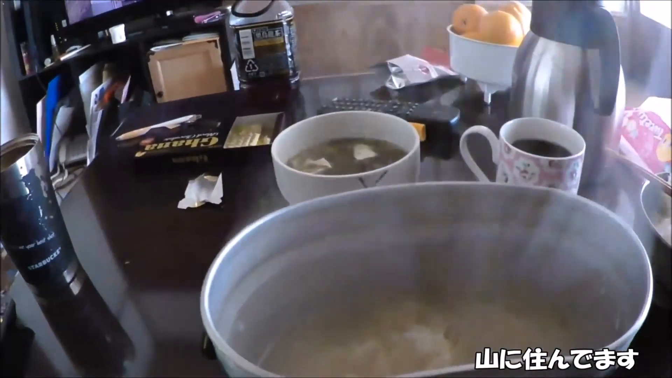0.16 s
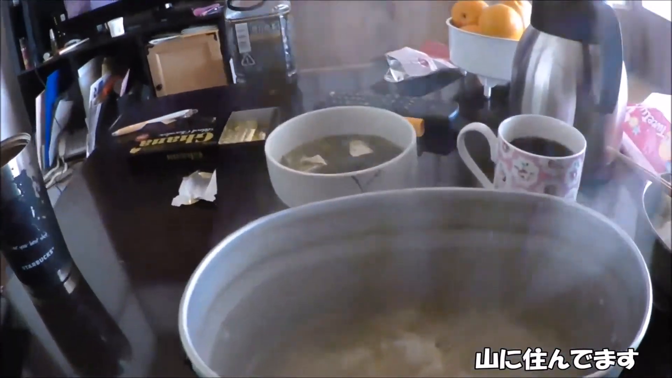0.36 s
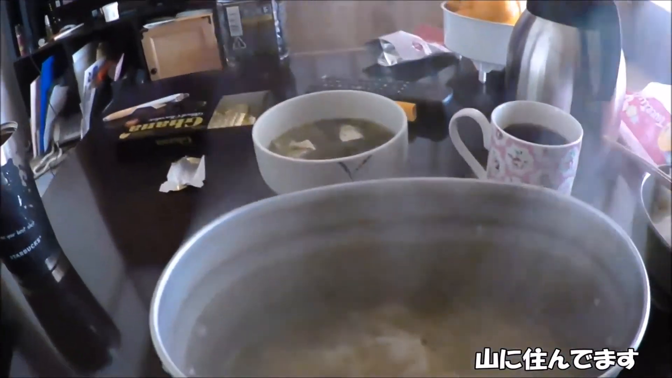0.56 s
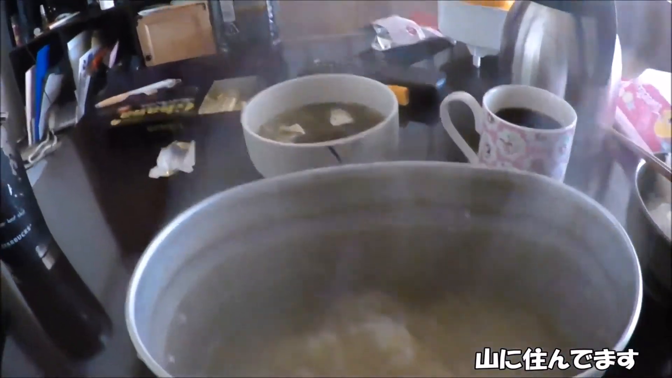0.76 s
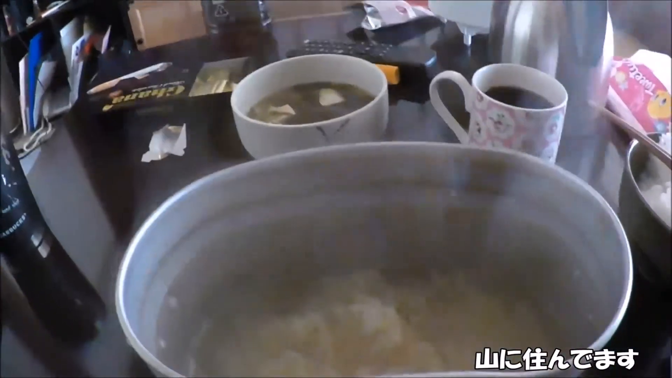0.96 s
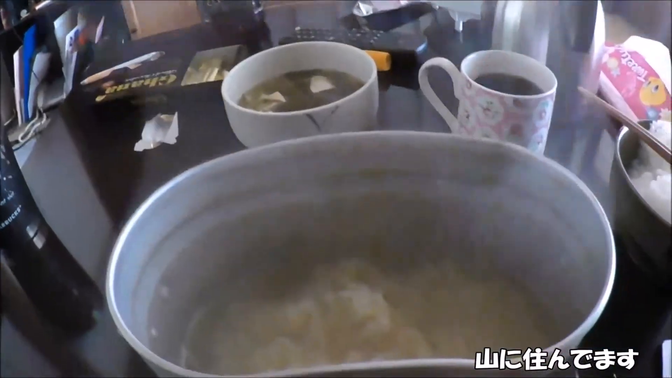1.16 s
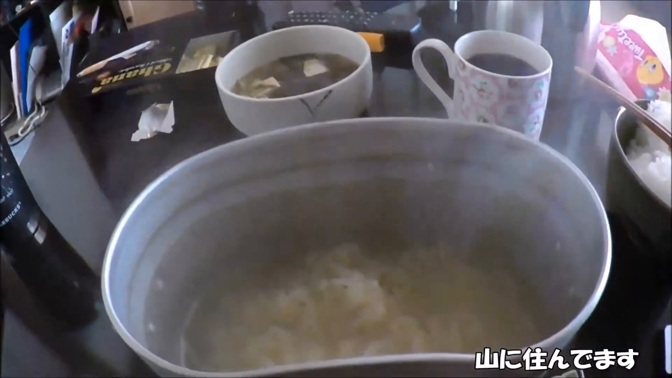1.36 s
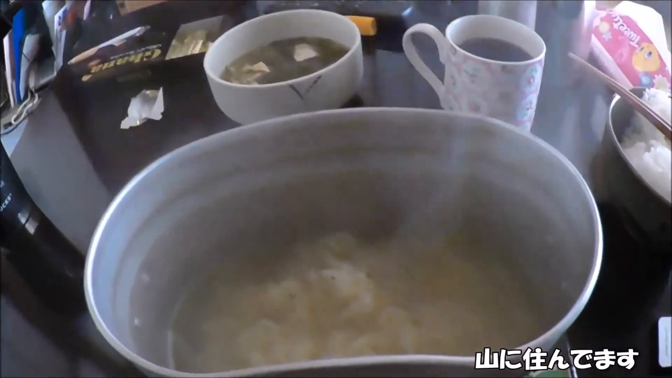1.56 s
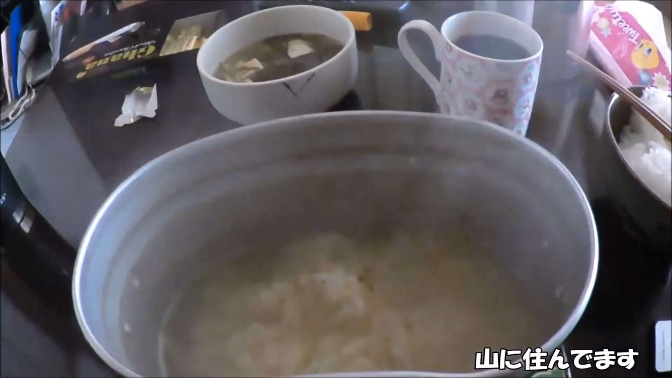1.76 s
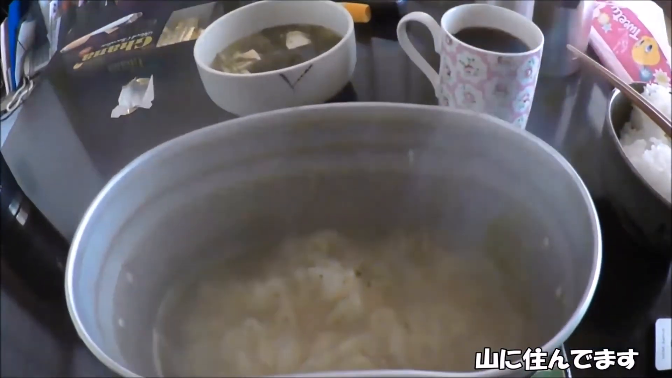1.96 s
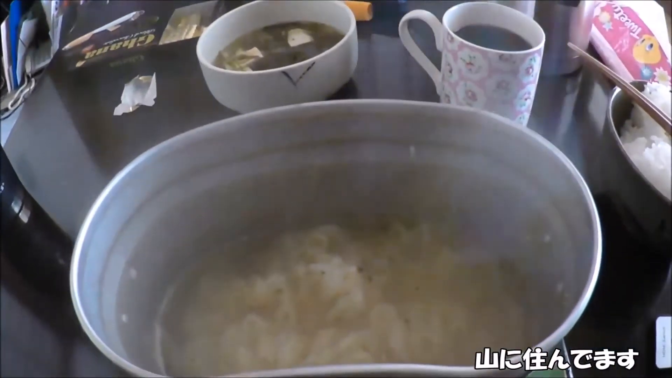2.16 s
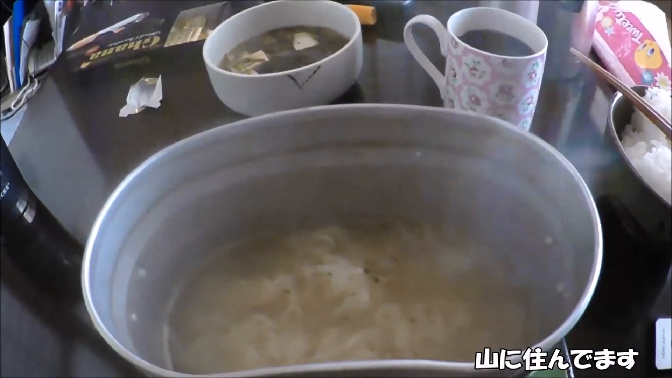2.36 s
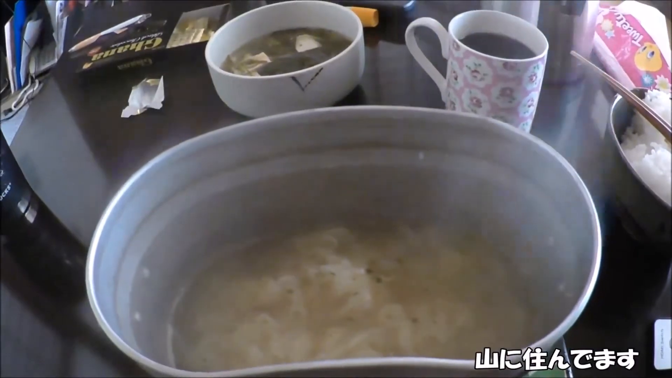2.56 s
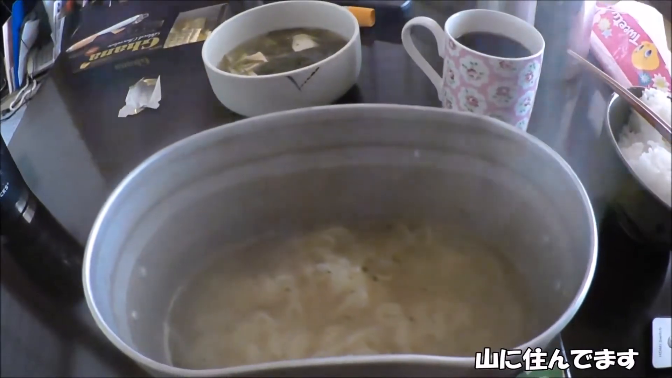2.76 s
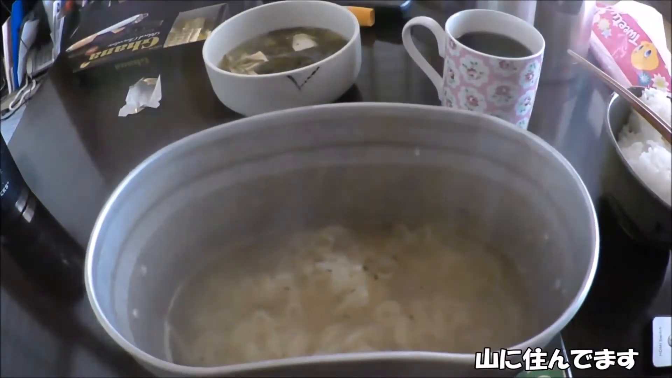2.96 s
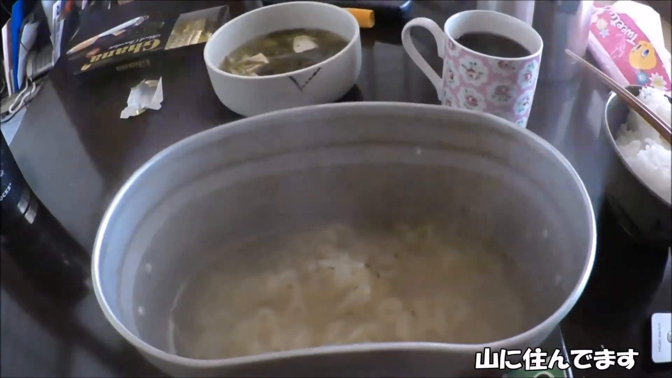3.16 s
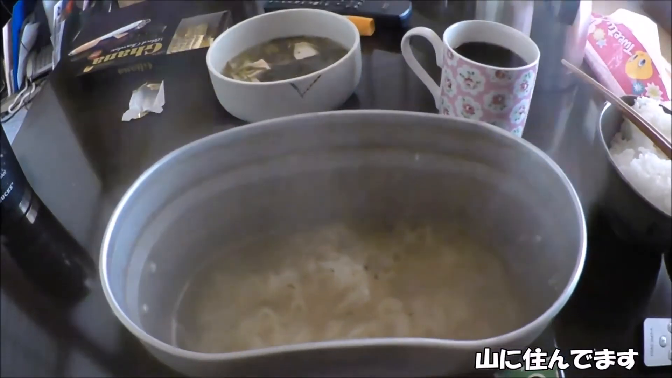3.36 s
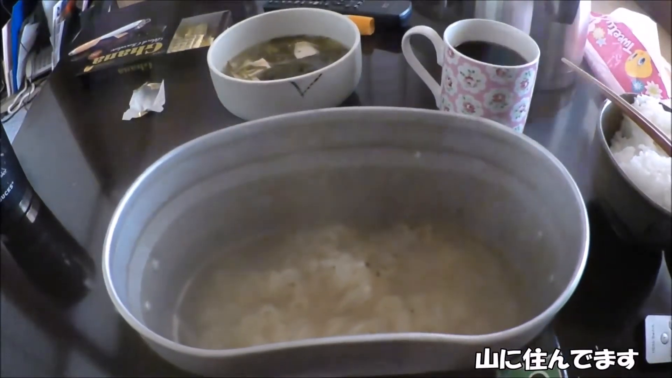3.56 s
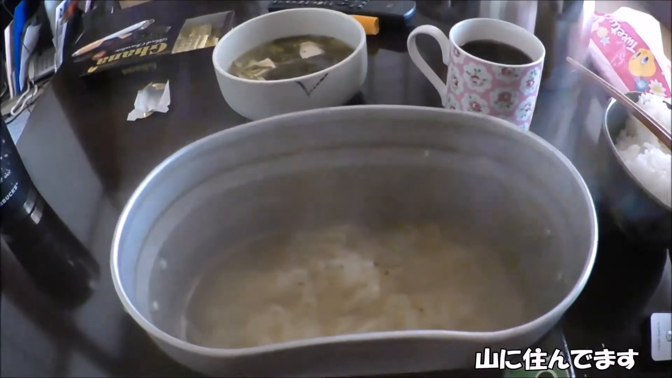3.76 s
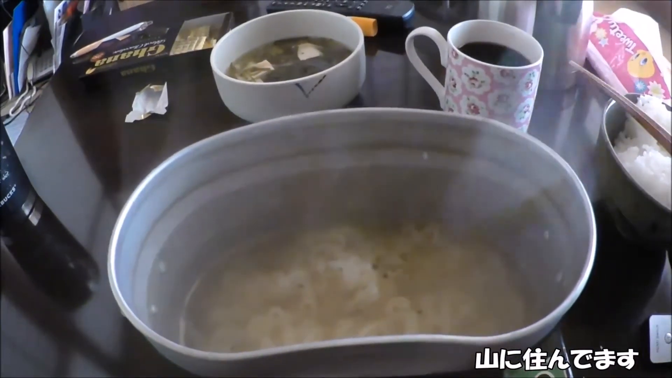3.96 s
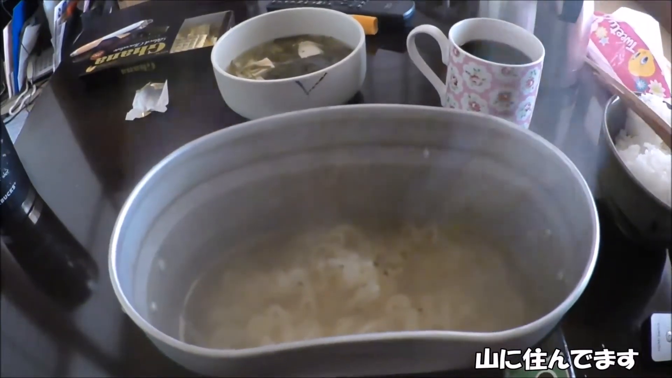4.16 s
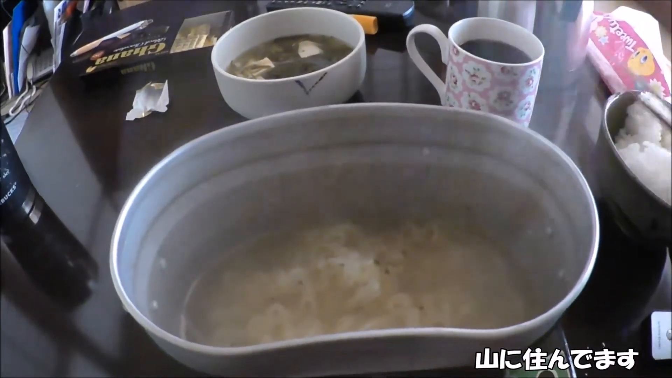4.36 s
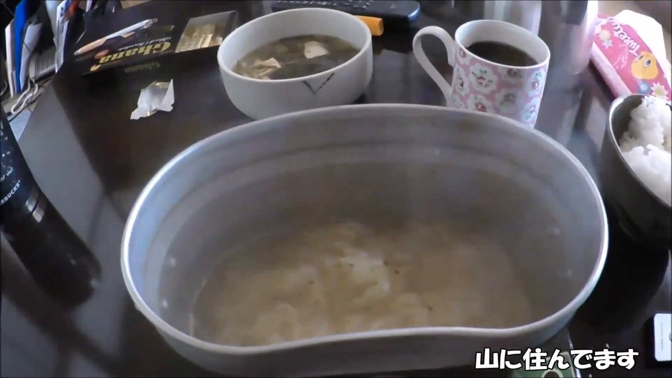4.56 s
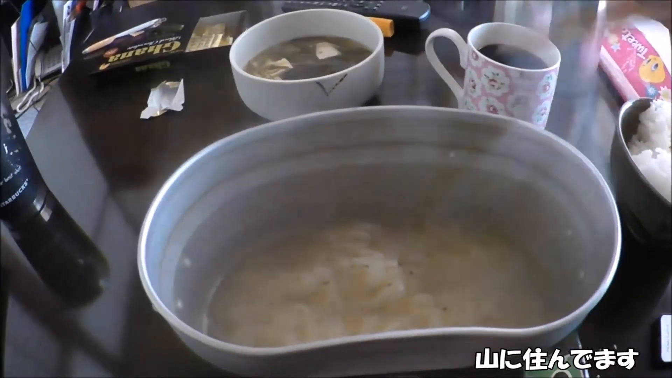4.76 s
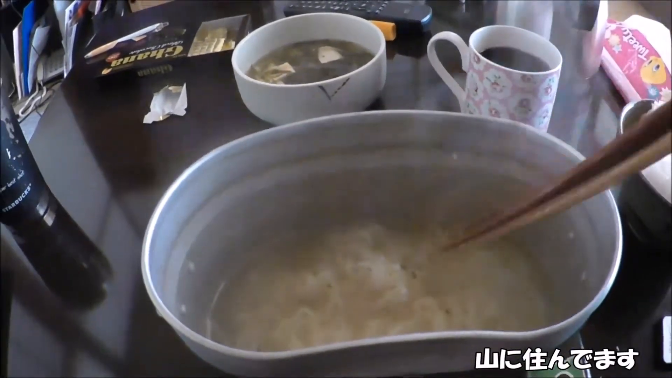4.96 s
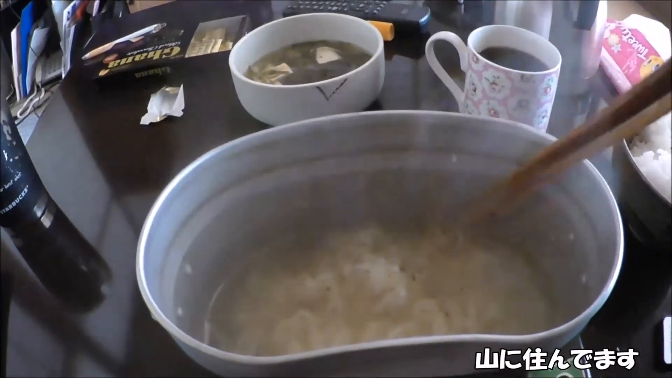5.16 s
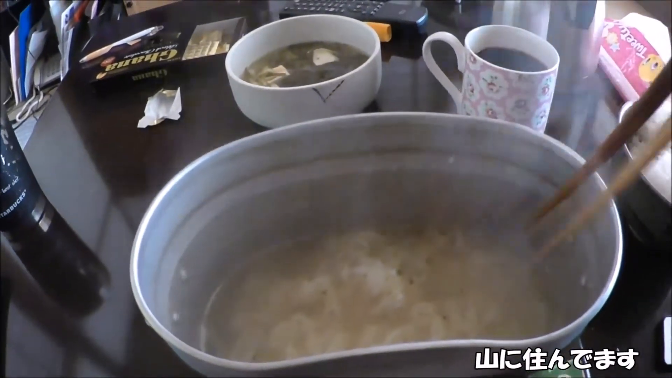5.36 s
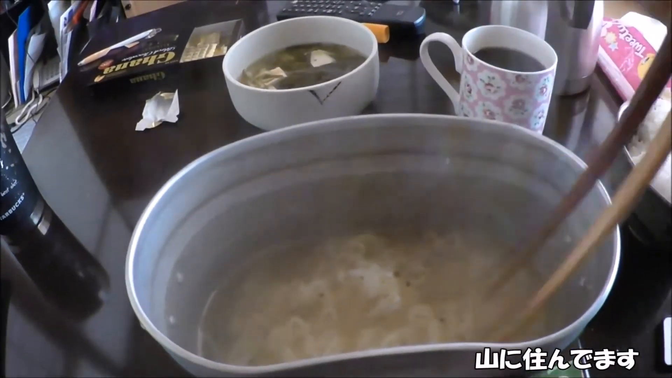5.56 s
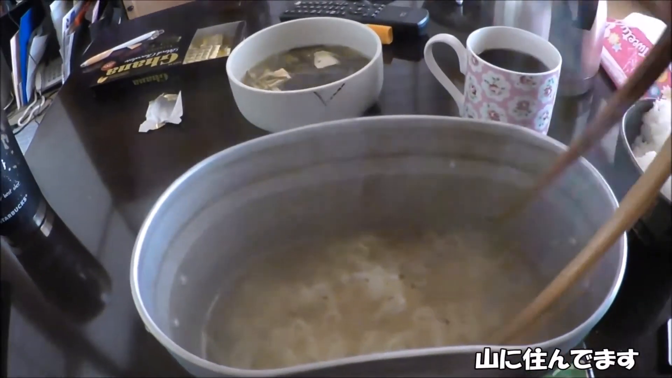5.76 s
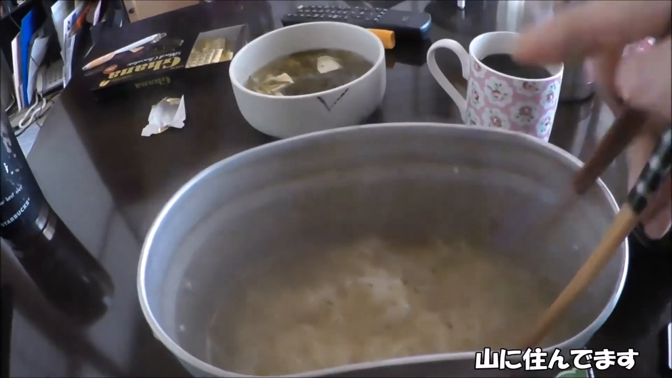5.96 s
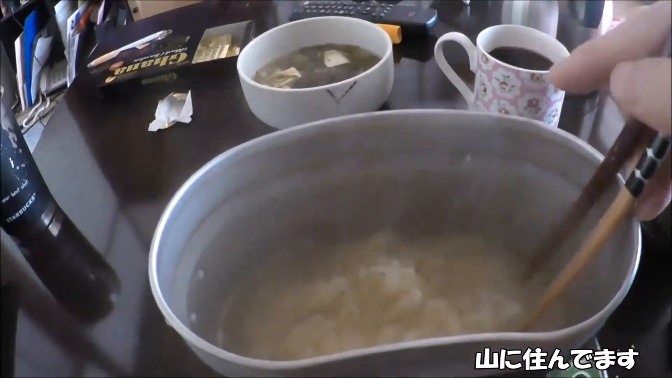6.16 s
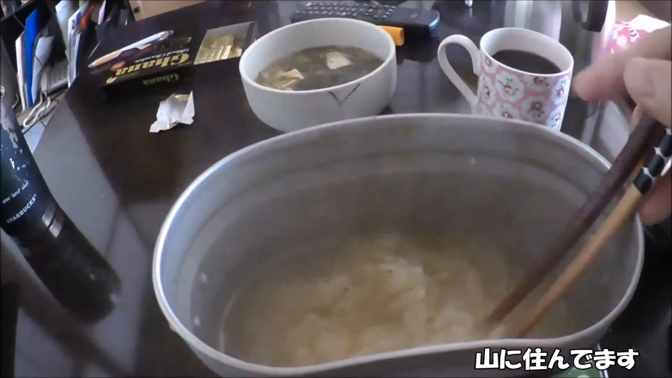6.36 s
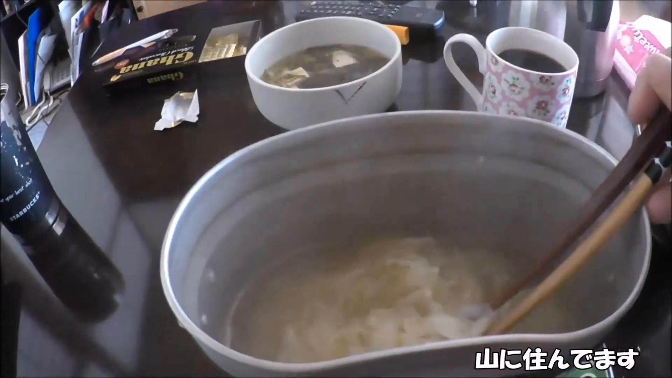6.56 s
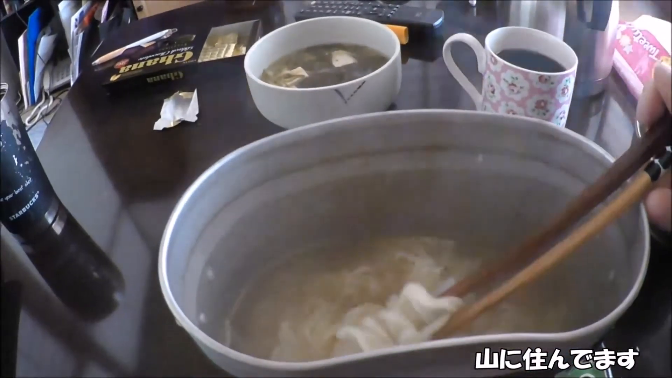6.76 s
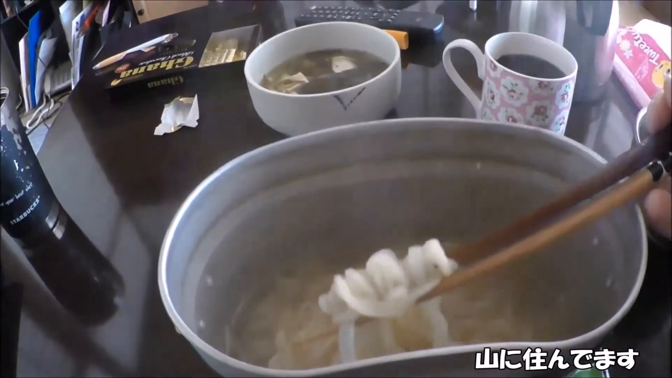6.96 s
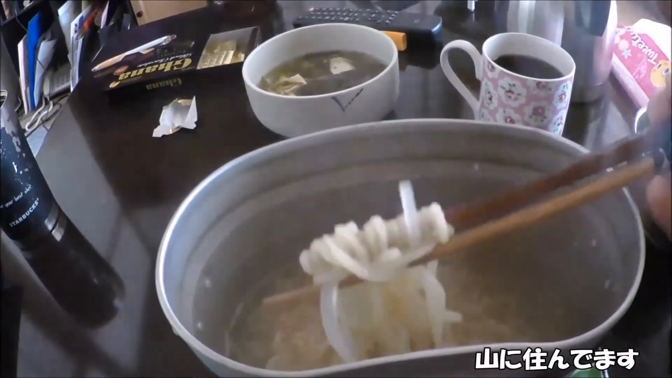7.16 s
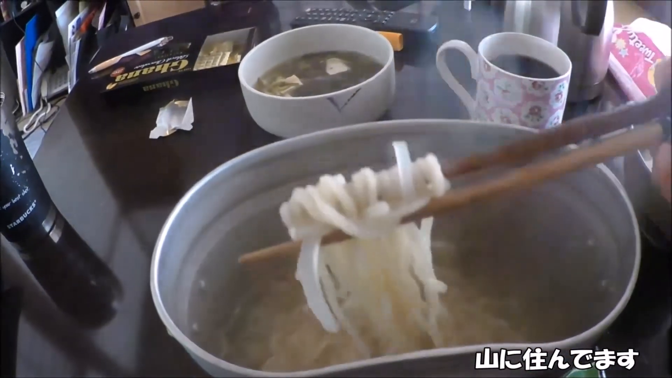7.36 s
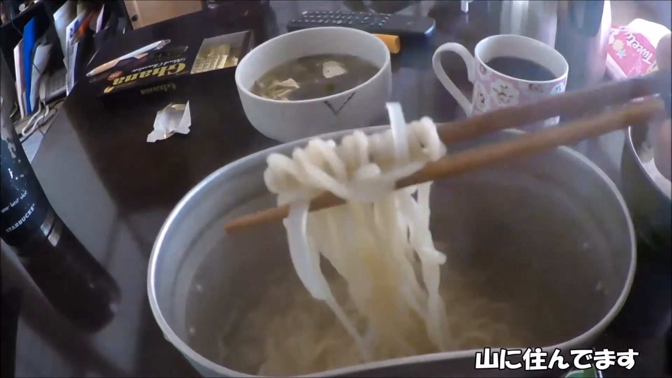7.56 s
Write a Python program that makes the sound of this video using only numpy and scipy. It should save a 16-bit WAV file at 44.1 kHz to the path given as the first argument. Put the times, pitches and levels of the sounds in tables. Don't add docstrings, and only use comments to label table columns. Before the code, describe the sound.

Muffled rubbing and one very loud thud, then chopsticks clicking on a metal pot, a sharp clatter, short squeaky scrapes and soft wet stirring.

```python
import sys
import numpy as np
from scipy import signal
from scipy.io import wavfile
from scipy.ndimage import uniform_filter1d

SR = 44100
rng = np.random.default_rng(int(sys.argv[2]) if len(sys.argv) > 2 else 0)


def to_linear_factor(level_db):
    exponent = np.asarray(level_db, float) / 20
    return 10 ** exponent


def output_pcm(signal):
    pcm = np.clip(np.atleast_2d(signal).T, -1, 1) * 32767
    wavfile.write(sys.argv[1], SR, np.round(pcm).astype(np.int16))


N = 336042


def evened(x):
    return x / np.sqrt(np.mean(x ** 2) + 1e-20)


def add(mix, s, sound):
    part = mix[round(s * SR):][:len(sound)]
    part += sound[:len(part)]


def read(points, hz):
    f, value = np.transpose(points)
    return np.interp(np.log(hz + 1), np.log(f + 1), value)


def coloured(x, points):
    gain_db = np.maximum(read(points, abs(np.fft.fftfreq(4096, 1 / SR))), -110)
    log_gain = np.log(to_linear_factor(gain_db))
    taps = np.fft.ifft(np.exp(np.conj(signal.hilbert(log_gain)))).real[:2048]
    return signal.oaconvolve(x, taps)[:len(x)]


def resonate(x, hz, width_hz):
    turn = np.exp(2j * np.pi * np.cumsum(hz) / SR)
    r = np.exp(-np.pi * width_hz / SR)
    return (turn * signal.lfilter([1 - r], [1, -r], x / turn)).real


# pitch_hz, gain_db
PORT = [(20, -30), (80, -18.5), (200, 3.5), (3300, 6), (4300, -31), (5600, -30.5), (6300, -4),
        (16500, -1.5), (17000, -42)]


def through_port(x):
    return coloured(x, PORT)


# pitch_hz, level_db (per Hz)
RASP = [(700, -12.5), (1300, -16), (2000, -9), (3000, -8), (4000, -21.5), (4500, -49.5), (5200, -35),
        (5750, -43.5), (6200, -24.5), (7200, -25), (7800, -35.5), (8900, -22.5), (10500, -34),
        (12500, -34.5), (15500, -27.5), (15950, -75)]


def rasped(x):
    return coloured(x, RASP)


def ring(modes):
    t = np.arange(6000)[:, None] / SR
    hz, db, t60 = np.transpose(modes)
    swell = 1 - np.exp(-t * hz / 0.6)
    decay = to_linear_factor(db - 60 * t / np.clip(t60, .003, .2))
    return through_port((swell * decay * np.sin(2 * np.pi * hz * t)).sum(1))


def grit(count, per_s, spread_db):
    size = to_linear_factor(spread_db * np.minimum(rng.exponential(1, count), 4)) * rng.choice([-1, 1], count)
    return evened(size * (rng.random(count) < per_s / SR))


def blow(modes, db, contact_ms, crack_db):
    t = np.arange(6000) / SR
    push = np.exp(-.5 * ((t[:200] * 1000 - 3 * contact_ms) / contact_ms * 2) ** 2)
    body = -signal.oaconvolve(ring(modes), push)[:len(t)]
    burst = rng.standard_normal(len(t)) * to_linear_factor(-60 * t / .018) * (t > contact_ms / 1000)
    crack = rasped(burst)
    crack *= 2 * to_linear_factor(crack_db) / abs(crack).max()
    return to_linear_factor(db) * (body / abs(body).max() + crack)


def struck(modes, blows):
    track = np.zeros(N)
    for s, *how in blows:
        add(track, s, blow(modes, *how))
    return track


def slide(modes, surface, length, db, start_hz, change_db):
    squeak_db, scratch_db, rasp_db, sag_hz_per_s = surface
    squeak_width_hz, squeak_steady, rasp_fade_db_per_s = 38, .75, 118
    t = np.arange(-.1, .15, 1 / SR)
    slips = grit(len(t), per_s=2500, spread_db=3.0)
    body = evened(signal.oaconvolve(slips, ring([m for m in modes if m[0] < 4500]))[:len(t)])

    hz = start_hz - sag_hz_per_s * np.maximum(t, 0)
    squeak = resonate(resonate(slips, hz, squeak_width_hz), hz, squeak_width_hz)
    swing = abs(signal.hilbert(squeak)) + 1e-9
    squeak = evened(squeak / swing ** squeak_steady)
    second_bend = resonate(slips, 2.04 * hz, 130)
    squeak = squeak + to_linear_factor(-19) * evened(second_bend)

    scratch = rasped(slips)
    treble = signal.sosfilt(signal.butter(4, 5500, "high", fs=SR, output="sos"), scratch)
    stroke = (t >= 0) & (t < length)
    sound = body + to_linear_factor(squeak_db) * through_port(squeak) + to_linear_factor(scratch_db) * evened(scratch)
    sound = evened(sound[stroke])
    sound = sound + to_linear_factor(rasp_db - rasp_fade_db_per_s * t[stroke]) * evened(treble[stroke])
    sound = sound * to_linear_factor(db + change_db * t[stroke] / length)
    return sound * signal.windows.tukey(len(sound), .4)


def stroked(modes, slides, surface):
    track = np.zeros(N)
    for start, *how in slides:
        add(track, start, slide(modes, surface, *how))
    return track


# pitch_hz, level_db, t60_s
BOWL = [(336, -1.5, 0.091), (498, 8.5, 0.065), (815, 1.5, 0.055), (1194, 8, 0.013), (1355, -8.5, 0.059),
        (1825, -6.5, 0.05), (2280, 4.5, 0.0098), (2700, 0.5, 0.016)]
# start_s, peak_db, contact_ms, crack_db
BOWL_BLOWS = [
    (4.218, -30.5, 0.066, -25),
    (4.2244, -44, .05, -11.5),
    (4.231, -44, 0.15, -17),
    (4.2373, -47, 0.13, -12),
    (4.2515, -49, 0.23, -19),
]


def bowl_knocks():
    return struck(BOWL, BOWL_BLOWS)


# pitch_hz, level_db, t60_s
STICKS = [(610, -11, 0.015), (1020, -20, 0.023), (1550, -3.5, 0.021), (1970, -7.5, 0.015),
          (2330, -31, 0.018), (3220, -16, 0.011), (6800, -11, 0.012), (8850, 8, 0.0088),
          (10960, 14, 0.0051), (14800, 0, 0.005)]
# start_s, peak_db, contact_ms, crack_db
STICK_BLOWS = [
    (5.0203, -45, 0.15, -4.5),
    (5.0293, -31.5, 0.068, -7.5),
    (5.0324, -42, .08, -5),
]


def stick_clacks():
    return struck(STICKS, STICK_BLOWS)


# pitch_hz, level_db, t60_s
RIM = [(798, 1.5, 0.021), (1664, 3, 0.018), (2290, 3, 0.015), (2844, 2, 0.014), (3730, 1, 0.018),
       (5200, -12, .01), (7070, -7, .012), (9100, -19, 0.0065), (12300, -21, .008), (14500, -20, .008)]
# start_s, peak_db, contact_ms, crack_db
RIM_BLOWS = [
    (5.2279, -28.5, 0.026, -10),
    (5.2303, -38, .04, -13),
    (5.2415, -42, .05, -6),
    (5.2485, -43, .02, -5),
    (5.259, -38.5, 0.015, -9),
    (5.274, -44, 0.09, -26),
    (5.284, -52, 0.045, -12),
]
# start_s, length_s, level_db, squeak_hz, change_db
RIM_SLIDES = [
    (5.233, .034, -45, 2850, -2),
]


def rim():
    return struck(RIM, RIM_BLOWS) + stroked(RIM, RIM_SLIDES, (-22, 6, -26, 1500))


# pitch_hz, level_db, t60_s
TIPS = [(670, 2, 0.0083), (1540, -3, 0.0063), (2080, 8, 0.0054), (2770, -3, 0.0094), (3460, -4, 0.0038),
        (6100, -31, 0.014), (10200, -21, 0.016), (11580, -19, .015), (15100, -22, 0.02)]
# start_s, peak_db, contact_ms, crack_db
TIP_BLOWS = [
    (5.3626, -49, 0.045, -4.5),
    (5.392, -36, 0.016, -19),
    (5.4002, -43, 0.031, -12),
    (5.8854, -58, 0.033, -13),
    (6.9947, -70, 0.03, 2),
]


def tip_taps():
    return struck(TIPS, TIP_BLOWS)


# pitch_hz, level_db, t60_s
EDGE = [(2240, -4, 0.019), (3560, -5.5, 0.021), (7300, -2.5, 0.008), (9030, 13.5, 0.0046),
        (11900, 4.5, 0.0048), (14240, 6, 0.0046), (16100, 7, 0.006)]
# start_s, peak_db, contact_ms, crack_db
EDGE_BLOWS = [
    (4.494, -68, .03, -0.5),
    (4.51, -69, 0.039, -13),
    (5.9204, -27.5, 0.0212, -13.5),
    (5.9306, -34, 0.045, -17),
    (5.9376, -32.5, 0.027, -17),
    (5.943, -40, 0.026, -15),
    (5.9485, -50, .03, -16),
    (5.9522, -50.5, .03, -16),
    (6.85, -64, 0.027, 0),
    (6.913, -67, .03, 1),
]


def edge_clicks():
    return struck(EDGE, EDGE_BLOWS)


# pitch_hz, level_db, t60_s
TIN_TICK = [(1000, -5, 0.01), (1950, -12, .012), (2140, 14, 0.022), (2330, 2, 0.026), (2670, -14, .012),
            (3250, -12, 0.0092), (3750, -18, .006), (4700, -2, .005), (6470, -15, .009), (7000, -20, .007),
            (8600, -14, .006), (9220, -21, .006), (14500, -27, .005)]
# start_s, peak_db, contact_ms, crack_db
TIN_BLOWS = [
    (6.0509, -26.5, 0.028, -9.5),
    (6.0525, -23.5, 0.051, -15.5),
]


def tin_ticks():
    return struck(TIN_TICK, TIN_BLOWS)


# pitch_hz, level_db, t60_s
LIP = [(212, 0, .0275), (340, 22, .0056), (606, 9.5, .0094), (786, 7, .0315), (951, 11, .041),
       (1013, 19, .016), (1288, 10, .0085), (1489, -.5, .018), (1843, -7, .023), (2152, 4.5, .036),
       (2469, 12, .054), (2653, -1, .022), (3148, 3, .0056)]
# start_s, peak_db, contact_ms, crack_db
LIP_BLOWS = [
    (6.05175, -14, .015, -40),
    (6.05336, -11, .216, -40),
    (6.0553, -23.5, .27, -32),
    (6.0579, -19.5, .27, -36),
    (6.06135, -27.5, .024, -30),
    (6.06414, -21, .274, -36),
    (6.0726, -26, .255, -30),
]


def lip_clatter():
    return struck(LIP, LIP_BLOWS)


# pitch_hz, level_db, t60_s
WALL = [(583, -1.5, 0.038), (940, -1, 0.04), (1043, -7, 0.048), (2270, -20, 0.012), (2950, -21, .012),
        (3420, -23.5, .012)]
# start_s, length_s, level_db, squeak_hz, change_db
WALL_SLIDES = [
    (5.92, .013, -38, 1040, 0),
    (5.93, .035, -36.5, 1100, 0),
    (5.929, .034, -40.5, 965, -1),
    (5.965, .017, -41, 1045, 4),
    (5.983, .014, -45, 1020, 4),
    (5.993, .034, -35, 1015, -8),
    (6.026, .016, -62, 990, -4),
]


def wall_squeaks():
    return stroked(WALL, WALL_SLIDES, (9, -24, -26.5, 300))


# pitch_hz, level_db, t60_s
TIN = [(195, -1, 0.042), (360, 13, 0.0078), (600, 1.5, 0.031), (820, -28, 0.051), (950, 15.5, 0.016),
       (1150, 14, 0.012), (1550, -13, 0.011), (2100, 6, 0.009), (2490, 4.5, 0.01), (2750, -5, 0.007),
       (3300, -7, .005), (6400, -34, .01), (8900, -29, .008), (14500, -36, .006)]
# start_s, length_s, level_db, squeak_hz, change_db
TIN_SLIDES = [
    (6.07, .028, -42, 960, -6),
    (6.095, .032, -43, 1015, 5),
    (6.121, .019, -42, 1000, 1),
    (6.133, .026, -37, 990, -3),
    (6.134, .024, -43, 870, 0),
    (6.152, .036, -51, 960, -9),
]


def tin_scrapes():
    return stroked(TIN, TIN_SLIDES, (-3.5, -20, -43, 400))


# pitch_hz, level_db, t60_s
BROTH = [(228, 4.5, 0.017), (628, -7, 0.085), (805, 5.5, 0.019), (936, 5, 0.012), (2100, -16, 0.025),
         (2660, -18, 0.024), (3380, -31, 0.025)]
# start_s, peak_db, contact_ms, crack_db
BROTH_BLOWS = [
    (6.316, -24, 0.22, -31.5),
    (6.3221, -30, 0.11, -32),
    (6.336, -36, 0.12, -30),
    (6.591, -52, 0.15, -35),
    (6.733, -43, 0.28, -19),
    (6.801, -55, 0.21, -32),
]
# start_s, length_s, level_db, squeak_hz, change_db
STIRS = [
    (6.21, .09, -62, 845, 3),
    (6.57, .05, -62, 870, 0),
    (6.8, .085, -60, 820, 2),
    (6.915, .035, -61, 830, 0),
]


def noodles():
    return struck(BROTH, BROTH_BLOWS) + stroked(BROTH, STIRS, (-4, -11.5, -40, 30))


def drag(length, db, change_db):
    slips = grit(round(length * SR), per_s=9000, spread_db=2.5)
    level = to_linear_factor(np.linspace(db, db + change_db, len(slips)))
    return level * signal.windows.tukey(len(slips), .4) * evened(rasped(slips))


# start_s, length_s, level_db, change_db
DRAGS = [
    (5.936, 0.12, -53.5, -15),
    (6.053, 0.1, -53, -8),
]


def wood_grain():
    track = np.zeros(N)
    for start, *how in DRAGS:
        add(track, start, drag(*how))
    return track


def bump(db, ms):
    u = np.arange(1500) / SR * 1000 / ms
    return -3 * to_linear_factor(db) * np.sin(2 * np.pi * u / 1.85) * u * np.exp(-1.5 * u)


# pitch_hz, level_db, t60_s
CASE = [(264, -3.5, .063), (516, -22, .034), (655, -9.5, .0117), (829, 0, .0207), (988, -22, .035),
        (1110, -6.5, .0235), (1241, -1.5, .018), (1356, -4, .035), (1497, -19, .036), (1633, -23.5, .036),
        (2217, -11, .015), (2944, -11.5, .0114)]
# start_s, peak_db, contact_ms, crack_db
CASE_BLOWS = [
    (2.06348, -.5, .316, -52),
    (2.06501, -2.6, .406, -54),
    (2.07075, -22, .05, -45),
    (2.0782, -36, .1, -45),
]


def landing():
    track = struck(CASE, CASE_BLOWS)
    add(track, 2.064, bump(db=-31, ms=7))
    return to_linear_factor(-.085) * track / abs(track).max()


# pitch_hz, level_db, t60_s
GRIP = [(278, -10.5, .0114), (497, -2.5, .003), (704, -4, .003), (809, 20.5, .013), (1139, 17, .0155),
        (1256, 23.5, .016), (1782, 0, .003), (2838, -1, .012), (4010, 10, .006), (4900, 18, .005)]
# start_s, peak_db, contact_ms, crack_db, second_peak_db
GRIP_BLOWS = [
    (.72393, -15, .29, -50, -21.5),
    (.7314, -42, .34, -50, -52),
]


def light_touch():
    rock_s, second_contact = .00167, 1.3
    track = np.zeros(N)
    for s, db, ms, crack_db, second_db in GRIP_BLOWS:
        add(track, s, blow(GRIP, db, ms, crack_db))
        add(track, s + rock_s, blow(GRIP, second_db, second_contact * ms, crack_db))
    return track


# pitch_hz, level_db, t60_s
LANDING_TICK = [(4300, 11.5, .006), (6780, -0.5, .008), (8300, -6, .01), (9200, 0, .008), (11200, -5, .01),
                (14000, 0, .008), (15100, 3, .012), (16200, -8.5, .004)]
# start_s, peak_db, contact_ms, crack_db
LANDING_TICK_BLOWS = [
    (2.0641, -51.5, .012, -21),
    (2.0672, -48, .012, -19.5),
    (2.0712, -55.5, .012, -13),
    (2.0745, -60.5, 0.0122, -8),
]


def landing_ticks():
    return struck(LANDING_TICK, LANDING_TICK_BLOWS)


# start_s, peak_db, length_ms
BUMPS = [(0.295, -62, 1.2), (0.7243, -36, 3.5), (1.989, -42.5, 2.3), (6.118, -49, 2.8), (4.221, -46, 2.9),
         (5.99, -49, 2.4), (6.01, -46, 3.7), (6.146, -50, 1.8), (3.797, -46, 2.9), (3.833, -56, 1.8),
         (5.05, -36, 2), (5.258, -42, 3.4), (5.618, -46, 1.6), (5.739, -49, 4.5), (6.479, -38, 2.7),
         (7.06, -48, 2.1)]


def soft_pushes():
    track = np.zeros(N)
    for s, *how in BUMPS:
        add(track, s, bump(*how))
    return track


# pitch_hz, level_db (per Hz)
RUB = [(15, -16), (30, 12), (120, -5.5), (270, 5.5), (650, -1.5), (1100, -15), (2800, -18), (3600, -27.5),
       (4400, -63), (6000, -74.5)]
# start_s, hold_s, level_db, hollow_db (share of the hollow band)
SHIFTING = [(0.29, 0.015, -57, -12), (0.377, 0.064, -59, -12), (0.531, 0.022, -56.5, -7),
            (0.656, 0.038, -55, -2.5), (0.773, 0.049, -59, -0.5), (0.864, 0.073, -56, 1),
            (0.99, 0.37, -58.5, 1.5), (1.425, 0.15, -58.5, 1), (1.678, 0.026, -59.5, 1),
            (1.77, 0.026, -65.5, 6), (1.872, 0.052, -60.5, -5.5), (1.958, 0.077, -61.5, -5.5)]
# start_s, hold_s, level_db, hollow_db
EATING = [(2.81, 0.014, -58, -7), (3.6, 0.023, -72, -16), (3.666, 0.017, -64, -6), (3.8, 0.044, -57.5, -9),
          (4.018, 0.071, -64, -2), (4.25, 0.009, -62, -2), (4.559, 0.021, -62.5, -9),
          (4.664, 0.033, -62, -17), (4.809, 0.014, -59, 0), (4.949, 0.079, -60, -11),
          (5.62, .03, -65.5, -17), (5.737, 0.007, -63.5, -6), (5.808, 0.052, -67, 2.5), (6.35, .01, -67, 0),
          (6.45, 0.037, -66, -1), (6.58, 0.034, -71, 0), (6.7, 0.093, -64, -6), (6.916, 0.038, -67, -18),
          (7.056, 0.015, -67.5, -7), (7.2, 0.39, -69.5, -7)]


def handling():
    grab_s, let_go_db_per_s, rest_db = 0.0054, 156, -66.5
    hollow_hz, hollow_width_hz = 1150, 220
    t = np.arange(N) / SR
    rumble, band = np.full(N, to_linear_factor(rest_db)), np.zeros(N)
    for start, hold, db, hollow_db in SHIFTING + EATING:
        fall_db = let_go_db_per_s * np.maximum(t - start - hold, 0)
        move = np.clip((t - start) / grab_s, 0, 1) * to_linear_factor(db - fall_db)
        rumble = np.maximum(rumble, move)
        band = np.maximum(band, to_linear_factor(hollow_db) * move)
    rub = coloured(grit(N, per_s=700, spread_db=3.5) + 1.5 * rng.standard_normal(N), RUB)
    lumps = to_linear_factor(1.9 * evened(uniform_filter1d(rng.standard_normal(N), 900)))
    hollow = signal.lfilter(*signal.iirpeak(hollow_hz, hollow_hz / hollow_width_hz, SR), rub)
    return lumps * (rumble * evened(rub) + band * evened(hollow))


# pitch_hz, level_db, t60_s
CLOCK = [(754, -0.5, 0.21), (1520, 8, 0.018), (3300, -18, 0.03)]


def clock():
    track = np.zeros(N)
    for s in np.arange(.812, N / SR, 1.):
        add(track, s, blow(CLOCK, db=-54, contact_ms=0.32, crack_db=-32))
    return track


def table_scatter(near):
    t60_s, level_db = .05, -16
    t = np.arange(6000) / SR
    scatter = rng.standard_normal(len(t)) * to_linear_factor(-60 * t / t60_s) * (t > .003)
    return to_linear_factor(level_db) * signal.oaconvolve(near, scatter / np.linalg.norm(scatter))[:N]


PICTURES_PER_S = 30000 / 1001
# place (0-1), spike_height, fizz_db (treble)
TICKS = [(0.233, -0.17, 9.5), (0.266, -0.073, 5), (0.403, -1.16, 7.5), (.486, 0.16, 8.5), (.734, -0.57, 9),
         (0.906, 1, -1.5), (.986, 0.26, 10.5)]
# pitch_hz, level_db
SPIKE = [(60, 4.5), (400, -2), (1500, -2), (2800, -16.5), (4000, -38.5), (5600, -58.5), (6500, -28.5),
         (9500, -34.5), (13000, -37), (16500, -49)]


def picture_ticks():
    spikes = np.zeros(N)
    starts = np.arange(int(N / SR * PICTURES_PER_S) - 1)
    for at, height, _ in TICKS:
        strength = rng.uniform(0.96, 2.1, len(starts))
        spikes[((starts + at) / PICTURES_PER_S * SR).astype(int)] += height * strength
    one_spike = coloured(signal.unit_impulse(2048), SPIKE)
    return to_linear_factor(-53.5) * coloured(spikes, SPIKE) / abs(one_spike).max()


# pitch_hz, level_db (per Hz)
HISS = [(15, -30), (32, -12), (125, 1), (400, -5.5), (1100, -8), (2600, -18), (3500, -34.5), (4300, -57.5),
        (5400, -61.5), (6200, -53.5), (9000, -33), (12200, -37), (15000, -14.5), (15700, -20.5),
        (16100, -75.5)]
# pitch_hz, side_minus_mid_db
APART = [(60, -12.5), (150, -19.5), (380, -16), (950, -16), (2380, -11), (5980, -2.5), (15000, -10)]


def hiss():
    crackle_share, level_db = .1, -60.5
    period = np.arange(N) / SR * PICTURES_PER_S
    fizz_db, crackle_db = np.zeros((2, N))
    for at, _, fizz in TICKS:
        strength = rng.uniform(0.96, 2.1, int(period[-1]) + 1)
        near = np.exp(-((period - at) % 1) / 0.018)
        fizz_db += fizz * near * strength[period.astype(int)]
        crackle_db += crackle_share * fizz * near
    drive = 1.45 * rng.standard_normal(N) + 0.23 * grit(N, per_s=1100, spread_db=3.5)
    flare = rng.standard_normal(N) * to_linear_factor(fizz_db - 1.5)
    low = signal.sosfilt(signal.butter(3, 11000, fs=SR, output="sos"), drive * to_linear_factor(crackle_db))
    high = signal.sosfilt(signal.butter(3, 11000, "high", fs=SR, output="sos"), flare)
    mid = coloured(low + high, HISS)
    side = coloured(coloured(rng.standard_normal(N) * to_linear_factor(fizz_db + 1.0), HISS), APART)
    level = to_linear_factor(level_db) / np.sqrt(np.mean(mid ** 2))
    return level * (mid + side * np.array([[1], [-1]]))


# pitch_hz, level_db (rms)
WHINE = [(13776, -98.5), (14254, -91.5), (14616, -89), (14971, -91)]


def whine():
    return sum(to_linear_factor(db) * evened(resonate(rng.standard_normal(N), np.full(N, hz), width_hz=6))
               for hz, db in WHINE)


def scene():
    near = bowl_knocks() + stick_clacks() + rim() + tip_taps() + edge_clicks() + tin_ticks()
    near += lip_clatter() + wall_squeaks() + tin_scrapes() + noodles() + wood_grain() + clock()
    near += table_scatter(near)
    camera = landing() + light_touch() + landing_ticks() + soft_pushes()
    return near + camera + handling() + picture_ticks() + hiss() + whine()


def roll_off(x):
    return signal.sosfilt(signal.butter(12, 16700, fs=SR, output="sos"), x)


# time_s, level_db
FADE = [(0, -19), (.08, -9.5), (.2, -5), (0.309, 0.5), (7.7, 0)]


def record(dry):
    ceiling = .985
    faded = dry * to_linear_factor(np.interp(np.arange(N) / SR, *np.transpose(FADE)))
    return roll_off(np.clip(faded, -ceiling, ceiling))


dry = scene()
out = record(dry)
output_pcm(out)
```